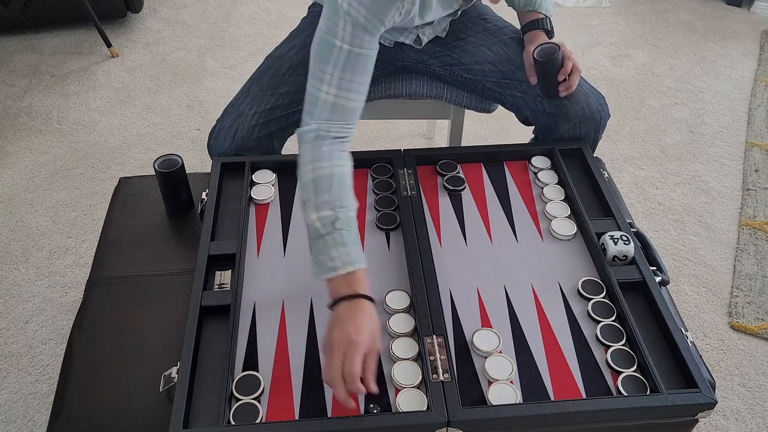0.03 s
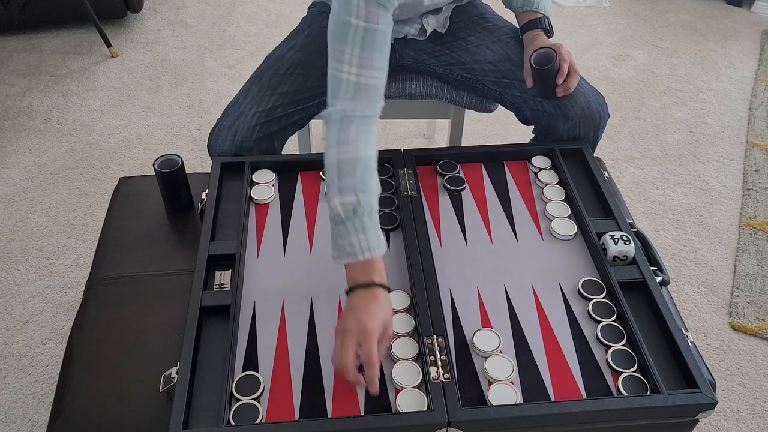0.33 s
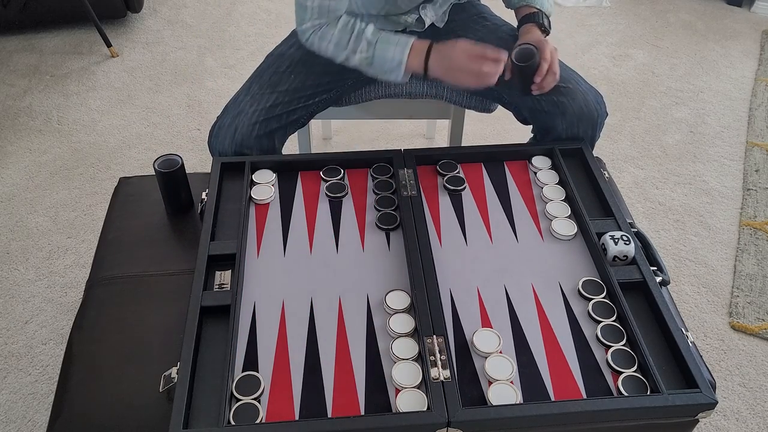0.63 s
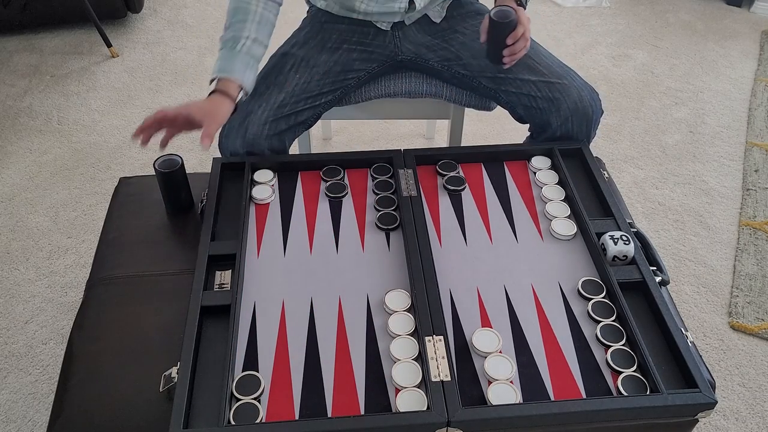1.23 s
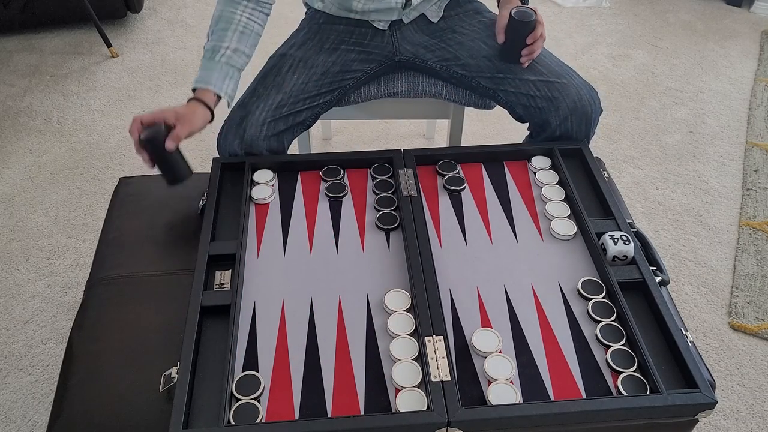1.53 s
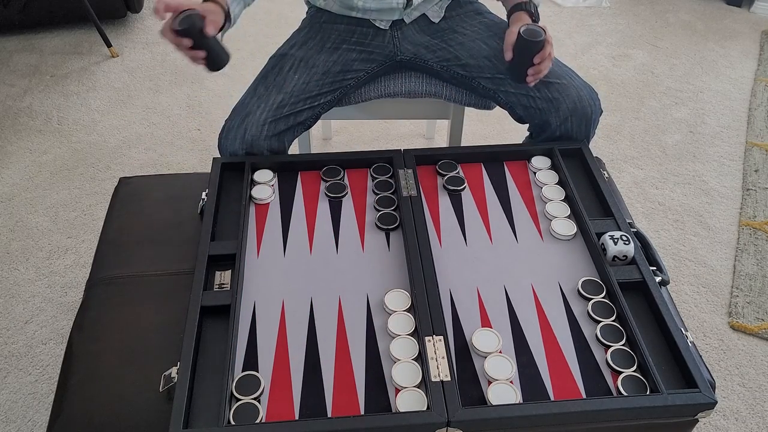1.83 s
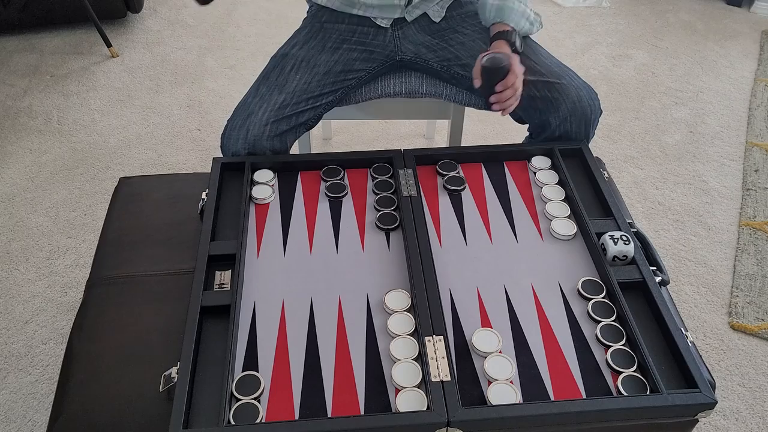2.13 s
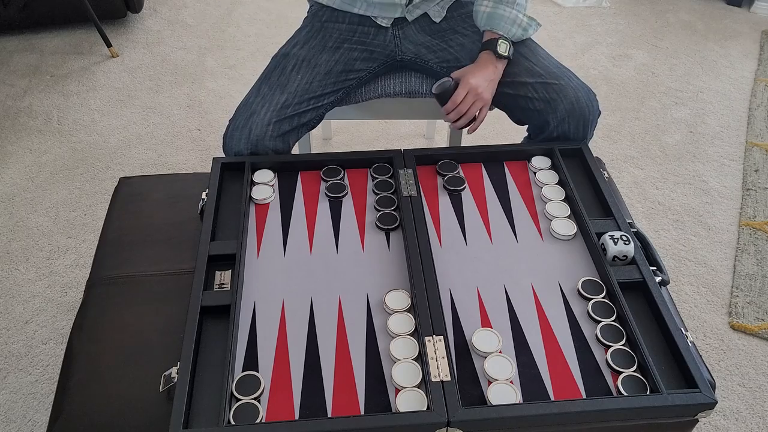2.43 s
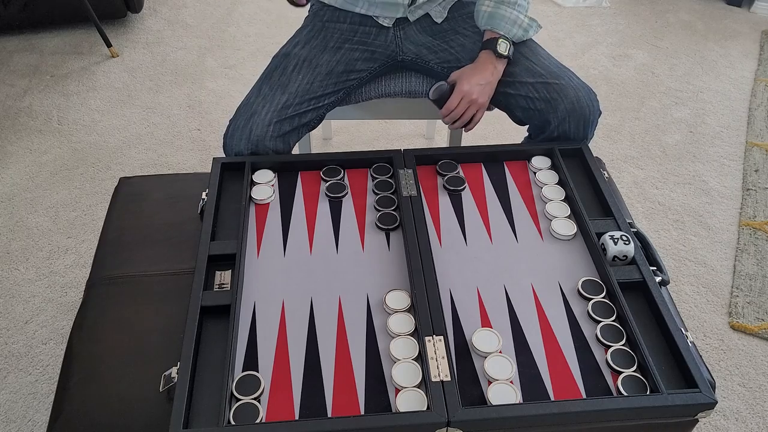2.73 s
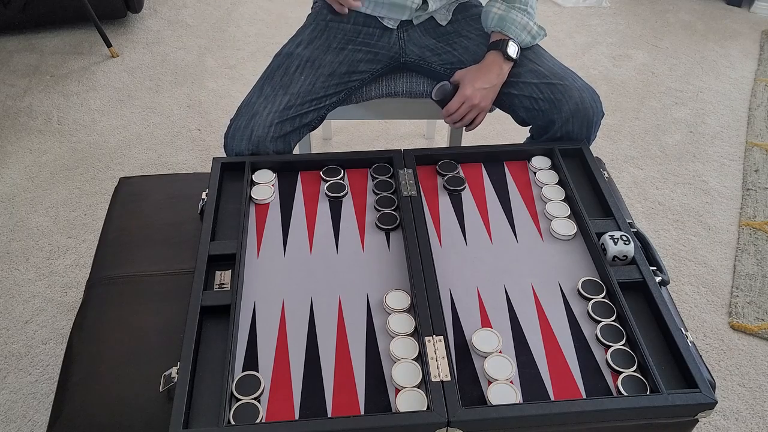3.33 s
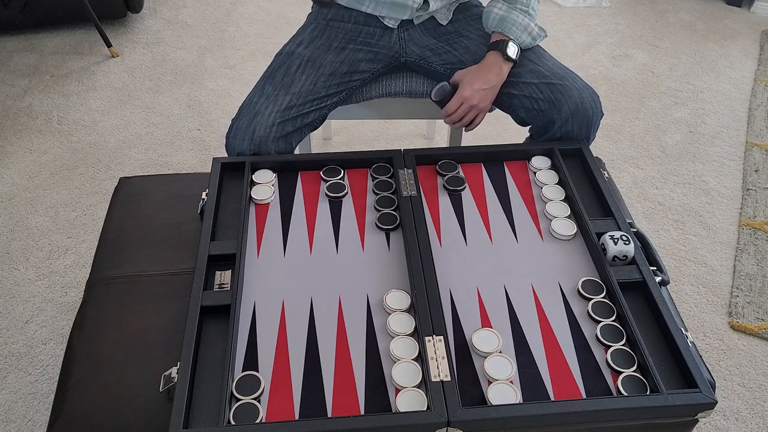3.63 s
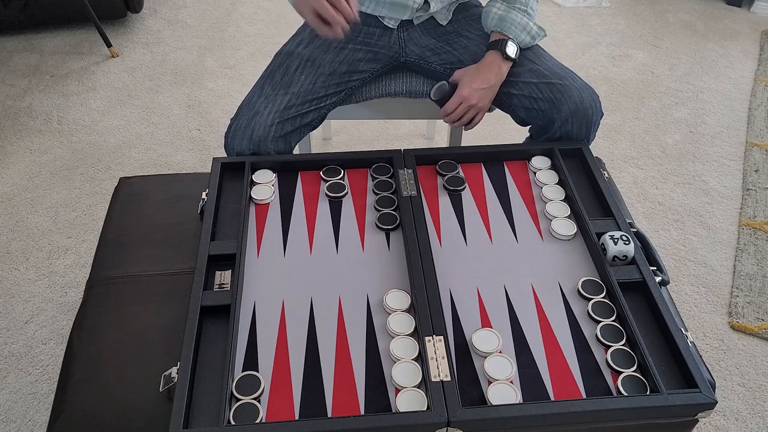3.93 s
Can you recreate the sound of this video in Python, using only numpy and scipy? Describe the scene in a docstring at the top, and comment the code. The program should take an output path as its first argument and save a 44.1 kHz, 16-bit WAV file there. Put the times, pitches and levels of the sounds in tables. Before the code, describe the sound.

Dice rattle in a cup in a quiet room. First a game piece clicks faintly and the dice drop in; after a pause they are shaken in a quick, even beat of hollow knocks and sharp clacks nearby.

```python
"""Two dice in a backgammon cup, in a quiet carpeted room with a faint ventilation hum.
A checker is touched, and at about 1 s the dice drop into the open cup. A few light touches follow.
From 2.3 s the covered cup is shaken about five times a second: the strokes throw the dice against its
end, where the air column gives a hollow knock, and in between they clack together.
After each hit the open game board throws back a quick reflection and the room rings briefly."""
import sys
import numpy as np
from scipy import signal
from scipy.fft import rfft, irfft
from scipy.io import wavfile
from scipy.ndimage import uniform_filter1d

SR = 44100
rng = np.random.default_rng(int(sys.argv[2]) if len(sys.argv) > 2 else 0)


def wrap_up_sound(samples):
    """Save the sound to the file named by the first command line argument, as 16-bit audio."""
    columns = np.atleast_2d(samples).T
    # keep every value between -1 and 1, then stretch to whole-number steps
    tamed = np.clip(columns, -1, 1)
    steps = np.round(tamed * 32767).astype(np.int16)
    wavfile.write(sys.argv[1], SR, steps)


N = 176400

# The cup's hollow voice, air column and wall: (frequency [Hz], relative level [dB], t60 [s])
CUP_MODES = [(642.6, 0.5, 0.028), (510, -39, 0.0083), (935, -44, 0.004), (1260, -7, 0.0098),
             (1975, -10.5, 0.01), (2280, -21, 0.014), (2950, -17.5, 0.0072)]
CUP_HZ = 637.9  # the air pitch at which the modes play as listed
def knock(db, pitch_hz, bright_db, ring=1, size=4096):
    """A die thuds on the end of the cup: the modes swell quickly and die away, over a short scuff."""
    t = np.arange(size) / SR
    swell_s, scuff_s, scuff_db = 0.0019, 0.0022, -47
    body = np.zeros(size)
    for hz, mode_db, t60 in CUP_MODES:
        ratio = hz / CUP_HZ
        gain = amp(mode_db + bright_db * np.log2(ratio))
        swell = 1 - np.exp(-(t * ratio / swell_s) ** 2)
        fade = amp(-60 * t / (t60 * ring))
        body -= gain * swell * fade * np.cos(2 * np.pi * ratio * pitch_hz * t)
    scuff = signal.sosfilt(signal.butter(2, 3000, fs=SR, output="sos"), rng.standard_normal(size))
    return amp(db) * (body + amp(scuff_db) * scuff * np.exp(-t / scuff_s))


# The beat of the shake: (time [s], level [dB], air pitch [Hz], brightness [dB/octave])
SHAKE_KNOCKS = [(2.3078, -16, 645, -1), (2.5775, -9.5, 641, 0.5), (2.7863, -8, 644, 0.5),
                (2.791, -19, 623, 4.5), (2.9665, -5, 651, 0.5), (3.1584, -8, 636, -1),
                (3.1755, -12.5, 658, -1.5), (3.3405, -34.5, 640, 7.5), (3.3971, -5, 647, 1.5),
                (3.6229, -7.5, 637, -2), (3.6375, -15, 667, -0.5), (3.8437, -9.5, 639, 0.5)]
def shake_cup(mix):
    """The strokes throw the dice against the end of the covered cup."""
    for s, db, hz, bright_db in SHAKE_KNOCKS:
        hit = knock(db, hz, bright_db)
        add(mix, s, in_room(hit, room_db=-2, build_s=0.0082, lead_s=0.00002, pan_db=0.3))


# The landing and its bounces: (time [s], level [dB], air pitch [Hz])
DICE_DROPS = [(.9408, -20.5, 757), (.9462, -20.5, 728), (.972, -34, 772), (1.0475, -43, 765),
              (1.093, -38, 930), (1.111, -31.5, 723)]
def drop_dice(mix):
    """The dice land in the open cup, which rings higher, duller and longer than the covered one."""
    for s, db, hz in DICE_DROPS:
        hit = knock(db, hz, bright_db=-9.5, ring=1.26)
        add(mix, s, in_room(hit, room_db=0.5, build_s=0.0082))


def clack(db, bright_db, spectrum, peaks=(), size=4096):
    """A hard contact with a moment of chatter, coloured by what is struck."""
    hz, t = np.fft.rfftfreq(size, 1 / SR), np.arange(size // 8) / SR
    chatter, chatter_s, boost_db = 0.36, 0.00063, 8
    colour = read(spectrum, hz) + bright_db * np.log2(np.maximum(hz, 2500) / 6500)
    colour += sum(bell(hz, *peak) for peak in peaks)
    contact = chatter * rng.standard_normal(len(t)) * np.exp(-t / chatter_s)
    contact[0] = 1  # the first strike
    contact = rfft(contact, size)
    contact /= np.sqrt(uniform_filter1d(abs(contact) ** 2, size=160))  # flatten, keeping fine ripple
    return amp(db + boost_db) * signal.fftconvolve(irfft(contact), causal(colour))[:size // 2]


# Tone of a clack: (frequency [Hz], level [dB])
CLACK_COLOUR = [(200, -29.5), (650, 3), (1300, -13), (2600, -9), (3100, -9.5), (4400, -1), (5300, 2),
                (7000, 2.5), (9000, -4), (12000, -9.5), (16000, -23)]
# Resonances a clack wakes in the cup: (frequency [Hz], width [Hz], boost [dB])
CUP_PEAKS = [(2162, 196, 13.5), (3738, 190, 12.5), (5390, 270, 5.5), (6270, 170, 5), (6940, 270, 5.5),
             (8100, 280, 1.5), (8590, 310, 5)]
# Clacks and a few echoes: (time [s], relative level [dB], brightness [dB/octave], room send [dB])
CLACKS_AND_ECHOES = [(.957, -16.5, -3, -3), (.9635, -23, -2, 1), (1.028, -33, -4, -10), (1.095, -46, -9, 0),
                     (2.2815, -38.5, 3, 1), (2.2877, -29.5, -6, 5), (2.3197, -40, -9, -5),
                     (2.3364, -29.5, -2.5, -1), (2.4525, -30, -6.5, 2), (2.457, -19, -0.5, 4.5),
                     (2.4634, -29, -10.5, 3), (2.5935, -22.5, -9.5, 2.5), (2.5997, -36, -8, 1),
                     (2.6705, -9.5, 2, 2), (2.7901, -12, -3.5, -0.5), (2.8625, -10.5, -1.5, 1),
                     (2.9168, -29, -7.5, 6), (2.9744, -11, -2, 0.5), (2.997, -22, 0, -15),
                     (3.0625, -4.5, 2, -1), (3.1687, -11, -5.5, -1.5), (3.2639, -14.5, -2.5, 2),
                     (3.2805, -21.5, 1, -1), (3.367, -24, -5.5, 5), (3.4147, -26, 12.5, 0.5),
                     (3.5247, -21, -4.5, 1), (3.531, -29.5, -3.5, 12.5), (3.552, -24.5, -3, 0),
                     (3.6304, -34.5, 0, 6), (3.6447, -32.5, 1, 4), (3.7252, -14.5, 1, 4.5),
                     (3.8139, -22.5, -5, 0), (3.8649, -28.5, 3, 2), (3.9954, -28.5, -4, 11.5)]
def clacks_and_echoes(mix):
    """The dice clack; a few clacks are followed about 6 ms later by a softer echo off the board."""
    for s, db, bright_db, room_db in CLACKS_AND_ECHOES:
        sound = clack(db, bright_db, CLACK_COLOUR, CUP_PEAKS)
        lead_s = 0.00008 * rng.uniform(0.067, 1.7)
        add(mix, s, in_room(sound, room_db, build_s=0.0027, lead_s=lead_s, pan_db=0.3))


# Thin, ticking tone of a touch: (frequency [Hz], level [dB])
TOUCH_COLOUR = [(200, -28), (1500, -37), (3000, 4.5), (5000, 4.5), (7200, 2), (9000, -26), (16000, -35)]
# Small handling sounds: (time [s], relative level [dB], brightness [dB/octave], room send [dB])
LIGHT_TOUCHES = [(0.456, -37.5, -0.5, -7), (1.365, -61, -1, 4), (1.526, -47.5, 3.5, 8.5),
                 (1.903, -52, 6, 3)]
def touch_pieces(mix):
    """Light touches on a checker and on a second cup."""
    for s, db, bright_db, room_db in LIGHT_TOUCHES:
        add(mix, s, in_room(clack(db, bright_db, TOUCH_COLOUR), room_db, build_s=0.0027))


# Early reflections off the board and nearby things: (delay [s], left level [dB], right level [dB])
REFLECTIONS = [(.0012, -4.5, -1.5), (.0063, -15, -7.5), (.0095, -28, -12.5)]
def in_room(sound, room_db, build_s, lead_s=0, pan_db=0, size=32768):
    """Direct sound, reflections and tail, new for each cup position. Lead and pan favour the left."""
    hz = np.fft.rfftfreq(size, 1 / SR)
    tail = room_tail(room_db, build_s, size) + standing_waves(size)
    pan_db = pan_db + bell(hz, 10400, 4300, db=4)  # the left ear hears more of the top treble
    near = amp([pan_db, -pan_db]) * np.exp(-2j * np.pi * hz * np.array([[0], [lead_s]]))
    for delay, left_db, right_db in REFLECTIONS:
        delays = delay + rng.normal(0, 0.00022) + rng.normal(0, 0.00005, (2, 1))
        near += amp([[left_db], [right_db]]) * np.exp(-2j * np.pi * hz * delays)
    return irfft((near + rfft(tail)) * rfft(sound, size))[:, :size * 3 // 4]


# Tone and length of the reverb: (frequency [Hz], level at 0 dB send [dB], t60 [s])
REVERB = [(189, -9.5, 0.2), (556, 3, 0.34), (1270, -1, 0.35), (2040, 1, 0.4), (3760, -1, 0.35),
          (7200, -2, 0.38), (11200, 0, 0.25), (16000, 0.5, 0.15)]
def room_tail(room_db, build_s, size):
    """Scattered reflections build up, then each band dies at its own rate."""
    _, noise = diffuse(size, likeness_hz=600)
    hz, t, bands = signal.stft(irfft(noise), SR, nperseg=256)
    t60 = read(REVERB, hz, column=2)[:, None]
    envelope = amp(-60 * t / t60) * (1 - np.exp(-(t / build_s) ** 3))
    envelope /= np.sqrt((envelope ** 2).mean(1, keepdims=True) * size)  # equal energy per band
    gain = amp(read(REVERB, hz)[:, None] + room_db)
    return signal.istft(bands * envelope * gain, SR, nperseg=256)[1][:, :size]


# Lingering notes of the room: (frequency [Hz], relative level [dB], t60 [s])
ROOM_MODES = [(458.7, -40, 0.27), (528, -40.5, 0.34), (597, -39.5, 0.52), (615, -55, 0.73)]
def standing_waves(size, gain_db=-15.5):
    """A hit wakes a few standing waves between the furniture and walls."""
    t = np.arange(size) / SR
    return sum(amp(gain_db + db - 60 * t / t60) * np.cos(2 * np.pi * f * t) for f, db, t60 in ROOM_MODES)


# Soft bed of moving air: (frequency [Hz], relative level [dB])
AIR_COLOUR = [(25, -19), (45, -15), (80, -17), (130, -14), (250, -11.5), (360, -10), (450, -8.5),
              (600, -17), (800, -26.5), (1150, -22), (1600, -34), (2300, -36.5), (3000, -34.5), (4000, -43),
              (6500, -45), (8500, -55), (16000, -55)]
# Hum lines: (frequency [Hz], RMS level [dB])
HUM_LINES = [(58.5, -70.5), (120, -73), (165, -75.5), (189, -80), (355.3, -63.5), (382, -70.5)]
def room_tone(air_db=-60):
    """Steady ventilation noise with a faint hum."""
    t = np.arange(N) / SR
    hz, noise = diffuse(N, likeness_hz=1110)
    air = irfft(noise * amp(read(AIR_COLOUR, hz)), N)
    hum = sum(amp(db) * np.sqrt(2) * np.sin(2 * np.pi * (f * t + rng.random())) for f, db in HUM_LINES)
    return amp(air_db) * air / air.std() + hum


def amp(db):
    """Decibels to gain."""
    return 10 ** (np.asarray(db) / 20)


def bell(hz, centre_hz, width_hz, db):
    """A bell-shaped EQ curve in dB."""
    return db / (1 + (2 * (hz - centre_hz) / width_hz) ** 2)


def read(points, hz, column=1):
    """One column of a table, joined on a log-frequency axis."""
    columns = np.transpose(points)
    return np.interp(np.log(hz + 1), np.log(columns[0] + 1), columns[column])


def add(mix, s, sound):
    """Mixes a stereo sound in at time s."""
    part = mix[:, round(s * SR):][:, :sound.shape[1]]
    part += sound[:, :part.shape[1]]


def causal(db, size=4096):
    """The quickest-dying impulse response with this spectrum."""
    log_gain = np.log(amp(np.r_[db, db[-2:0:-1]]))
    phase = -signal.hilbert(log_gain).imag[:len(db)]
    return irfft(amp(db) * np.exp(1j * phase))[:size // 2]


def diffuse(size, likeness_hz):
    """Spectra of left and right white noise, alike below likeness_hz and unrelated above."""
    hz = np.fft.rfftfreq(size, 1 / SR)
    same = .93 / (1 + (hz / likeness_hz) ** 4)
    mid, side = rfft(rng.standard_normal((2, size)))
    mid, side = mid * np.sqrt((1 + same) / 2), side * np.sqrt((1 - same) / 2)
    return hz, np.array([mid + side, mid - side])


def scene():
    """Over the room tone, the dice drop in, then knock and clack as the cup is shaken."""
    mix = room_tone()
    drop_dice(mix)
    shake_cup(mix)
    clacks_and_echoes(mix)
    touch_pieces(mix)
    return mix


def record(dry):
    """A steep high cut at 16.3 kHz."""
    high_cut = signal.firwin(511, 16300, window=("kaiser", 9), fs=SR)
    return signal.oaconvolve(dry, high_cut[None], "same")


dry = scene()
out = record(dry)
wrap_up_sound(out)
```